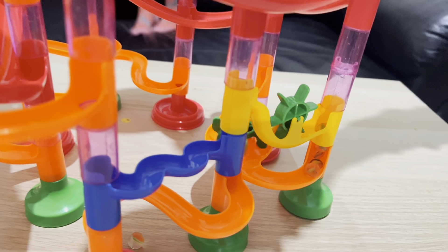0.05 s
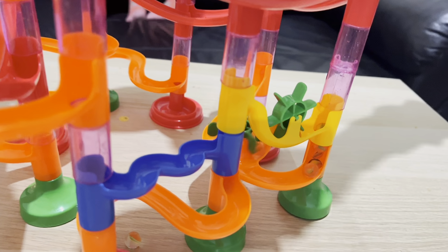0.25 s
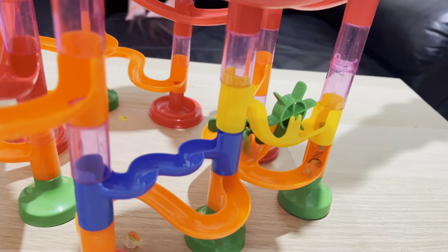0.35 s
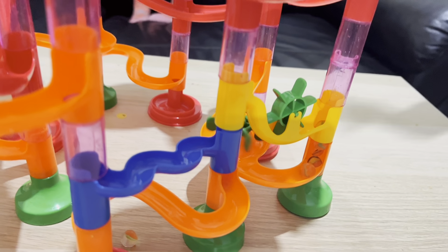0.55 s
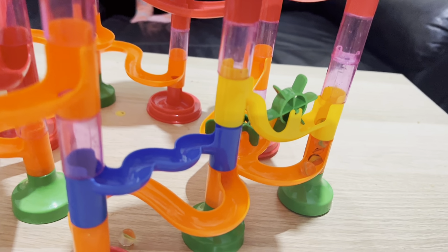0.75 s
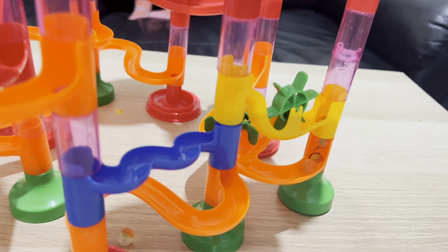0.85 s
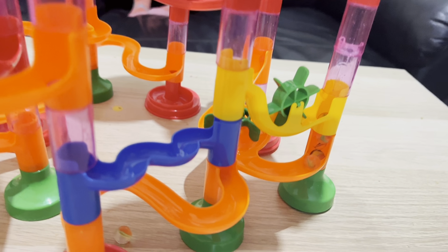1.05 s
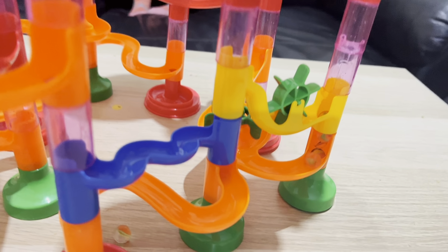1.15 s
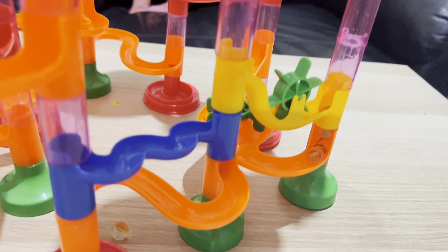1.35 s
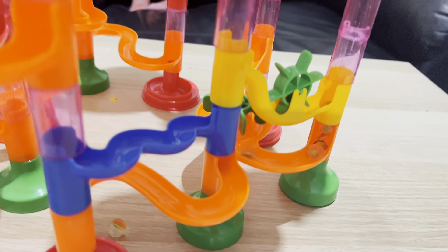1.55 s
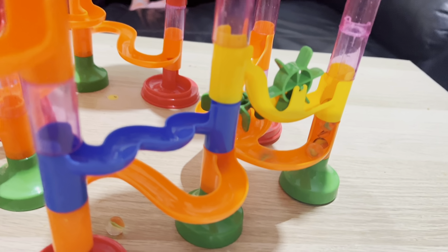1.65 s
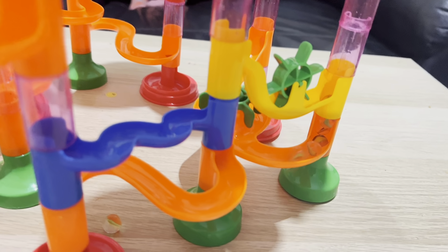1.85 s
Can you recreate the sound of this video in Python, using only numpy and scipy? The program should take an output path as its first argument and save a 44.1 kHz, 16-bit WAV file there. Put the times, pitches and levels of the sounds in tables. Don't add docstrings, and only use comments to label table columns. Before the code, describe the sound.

Glass marbles rattle down a plastic tower track, with bright glassy ticks and hollow tube knocks over a low rolling hum, growing denser to one loud clack, then easing; close phone microphone, small furnished room.

```python
import sys
import numpy as np
from scipy import signal
from scipy.fft import rfft, irfft
from scipy.io import wavfile
from scipy.ndimage import uniform_filter1d

SR = 44100
rng = np.random.default_rng(int(sys.argv[2]) if len(sys.argv) > 2 else 0)


def dump(signal):
    limited = np.clip(np.atleast_2d(signal).T, -1, 1)
    pcm = np.round(limited * 32767).astype(np.int16)
    wavfile.write(sys.argv[1], SR, pcm)


def voltage_ratio(decibels):
    exponent = np.asarray(decibels, float) / 20
    return 10 ** exponent


N = 83790


def unit(x):
    return x / np.sqrt(np.mean(x ** 2))


def peak(x):
    return x / abs(x).max()


def on_log(table, hz):
    table = np.array(table, float)
    return np.interp(np.log(hz + 1), np.log(table[:, 0]), table[:, 1])


def shape(x, gain):
    size = 8192
    cepstrum = irfft(np.log(gain(np.fft.rfftfreq(size, 1 / SR)) + 1e-7))
    cepstrum[1:size // 2] *= 2
    cepstrum[size // 2 + 1:] = 0
    kernel = irfft(np.exp(rfft(cepstrum)))[:size // 2]
    kernel = kernel.reshape((1,) * (x.ndim - 1) + (-1,))
    return signal.fftconvolve(x, kernel, axes=-1)[..., :x.shape[-1]]


def humps(peaks, hz, order=1):
    return np.sqrt(sum(voltage_ratio(2 * db) / (1 + (2 * (hz - f) / w) ** 2) ** order for f, w, db in peaks))


def glass_edge(hz):
    return 1 / (1 + (hz / 5200) ** 24)


def colour(table):
    return lambda hz: voltage_ratio(on_log(table, hz)) * glass_edge(hz)


def burst(length, attack_s, ring_s):
    t = np.arange(length) / SR
    return (1 - np.exp(-t / attack_s)) * voltage_ratio(-60 * t / ring_s)


def sine(hz, length):
    return np.sin(2 * np.pi * hz * np.arange(length) / SR)


def walk(rate):
    k = int(SR / rate)
    steps = np.repeat(rng.standard_normal(N // k + 1), k)
    return 1.3 * uniform_filter1d(uniform_filter1d(steps, k), k)[:N]


def add(out, x, at_s):
    i = int(at_s * SR)
    out[i:i + len(x)] += x[:N - i]


# (f/Hz, width/Hz, level/dB)
TREBLE = [(5620, 850, -2.5), (6150, 1120, -6), (7510, 750, -5), (8010, 1010, -1), (9344, 620, -7),
          (12600, 460, -12), (12500, 480, -13), (13810, 600, -7.5), (14400, 650, -11.5), (15600, 480, -20),
          (16300, 400, -37)]


def ports(hz):
    return humps(TREBLE, hz, order=3)


# (f/Hz, width/Hz, level/dB)
TRACK = [(473, 49, -12), (1175, 25.5, 0), (1310, 30, -7.5), (1655, 56, -1.5), (1994, 130, -8),
         (2550, 92, -7.5), (3360, 9.1, -18.5)]


def track(hz):
    return humps(TRACK, hz)


# (t/s, level/dB)
ROLL = [(0, -45.5), (.06, -51), (.2, -50.5), (.3, -55), (.37, -49.5), (.45, -48), (.53, -48), (.62, -43),
        (.73, -44.5), (.79, -40), (.87, -43.5), (.96, -42), (1.2, -48), (1.33, -48.5), (1.55, -45),
        (1.7, -51), (1.9, -47.5)]
# (f/Hz, level/dB)
ROLL_COLOUR = [(150, -6), (400, 1), (1000, -4.5), (2000, -13), (3300, -18), (4500, -11.5), (5200, -24.5)]


def rolling():
    grit_db, treble_db = -12, -30.5
    body = 0
    for hz in 200 * 2 ** np.arange(0, 5.):
        def band(f):
            bell = np.exp(-(np.log2((f + 1) / hz) / 0.71) ** 2)
            return colour(ROLL_COLOUR)(f) * bell * (1 + voltage_ratio(-1.5) * track(f))
        body = body + shape(rng.standard_normal((2, N)), band) * voltage_ratio(2.4 * walk(25.53))
    high = shape(rng.standard_normal((2, N)), ports) * voltage_ratio(6.4 * walk(34))
    load_db = np.interp(np.arange(N) / SR, *np.array(ROLL).T) - 1.5
    return (unit(body) + voltage_ratio(grit_db) * grit() + voltage_ratio(treble_db) * unit(high)) * voltage_ratio(load_db)


def grit():
    per_s, cycles, middle_hz = 200, 14, 1700
    out, length = np.zeros(N), 1024
    for when, pitch, size in rng.random((400, 3)):
        at_s = when * 400 / per_s
        hz = middle_hz * 2.4 ** (2 * pitch - 1)
        if at_s < N / SR:
            add(out, voltage_ratio(-14 * size) * sine(hz, length) * burst(length, 0.00044, cycles / hz), at_s)
    return unit(out) * np.array([[1], [.5]])


# (t/s, level/dB)
TABLE = [
    (0, -49.5),
    (.8, -44.5),
    (1.15, -47),
    (1.25, -52.5),
    (1.9, -55.5),
]


def table_top():
    hum = shape(rng.standard_normal((2, N)), lambda f: f ** 2 / (f ** 2 + 30 ** 2) / (1 + (f / 220) ** 3))
    level_db = np.interp(np.arange(N) / SR, *np.array(TABLE).T) + 1.65 * walk(20.26)
    return unit(hum) * voltage_ratio(level_db) * voltage_ratio([[0], [-14]])


# (t/s, peak level/dB, treble share level/dB, glass pitch f/Hz, clear ping share level/dB)
TICKS = [(0.0064, -35.5, -13.5, 4330, -3.5), (0.1707, -41, -9.5, 4440, -2), (0.22, -42, -7, 4570, 5),
         (0.234, -30, -7, 3030, -5), (0.239, -20, -7, 4570, -6), (0.2483, -26, -8, 3340, -6),
         (0.2582, -21.5, -7, 3250, -3), (0.273, -26.5, -5, 3300, -10.5), (0.3093, -36, -9, 4600, 2.5),
         (0.3511, -30.5, -4, 3340, -1.5), (0.383, -27, -10.5, 4550, 1), (0.4749, -34.5, -9.5, 4100, -14.5),
         (0.537, -30, -5.5, 4540, -13), (0.5533, -25.5, -7, 4380, -5), (0.557, -26.5, -18, 3340, 0),
         (0.577, -27.5, -8.5, 4240, -5), (0.596, -34.5, -9.5, 3390, -9), (0.6561, -18, -6.5, 4624, -4.5),
         (0.6895, -30, -16.5, 2840, -5.5), (0.7505, -25, -10, 4660, -6), (0.7995, -37, -1, 3330, -9.5),
         (0.8817, -27.5, -7, 3910, -9.5), (0.9047, -27, -11.5, 4400, -8.5), (0.926, -33, -20, 4400, -9),
         (0.9898, -27.5, -5, 4270, -4.5), (0.9943, -9.5, -20, 4334, 3.5), (1.003, -21, -14, 2595, -1.5),
         (1.0216, -26, -9, 4550, -3), (1.0701, -37, -4.5, 4000, -5), (1.0965, -35, -5, 4550, -6),
         (1.1507, -29.5, -12.5, 4330, 0), (1.2897, -38.5, -12.5, 4300, -13), (1.442, -39, -16, 4500, -2),
         (1.4636, -33, -15, 4060, -1), (1.5471, -40.5, -11.5, 4475, -6), (1.841, -32.5, -12.5, 4553, -5.5)]
# (t/s, peak level/dB, treble share level/dB, glass pitch f/Hz, ping share
# level/dB)
MORE_TICKS = [
    (1.716, -45, -27, 5800, 4),
    (0.961, -38, -42, 3100, -3),
    (1.7145, -38, -23, 2100, -3.5),
    (1.166, -30, -4.5, 4300, -1),
    (0.78, -20.5, -39, 2680, 2),
    (0.36, -37, -14, 5600, -13),
    (1.1, -43, -20, 4400, -10),
    (1.582, -40, -13, 4300, -6),
]


def ticks():
    attack_s, chatter_ring_s, glass_width_hz = 0.00048, 0.036, 500
    ping_rise_s, ping_ring_s = 0.0015, 0.029
    treble_ring_s, treble_vary_db = 0.019, 4
    sizzle_db, sizzle_ring_s = -19.5, 0.24
    out, size = np.zeros(N), 8192
    treble_fall = burst(size, attack_s, treble_ring_s) + voltage_ratio(sizzle_db) * burst(size, 0.0029, sizzle_ring_s)
    draws = rng.standard_normal((60, 3, size))
    for (s, db, treble_db, hz, ping_db), noise in zip(TICKS + MORE_TICKS, draws):
        glass = [(hz, glass_width_hz, 0), (3600, 1500, -5)]
        chatter = shape(noise[0] * burst(size, attack_s, chatter_ring_s),
                        lambda f: humps(glass, f) * glass_edge(f))
        ping = sine(hz, size) * burst(size, ping_rise_s, ping_ring_s)
        low = peak(chatter) + voltage_ratio(ping_db) * peak(ping)
        peaks = [(f, w, top_db + treble_vary_db * z) for (f, w, top_db), z in zip(TREBLE, noise[2])]
        high = shape(noise[1] * treble_fall, lambda f: humps(peaks, f, order=3))
        add(out, voltage_ratio(db) * (peak(low) + voltage_ratio(treble_db) * peak(high)), s)
    return out


# (t/s, peak level/dB, tube pitch f/Hz, rattle share level/dB)
KNOCKS = [(0.007, -32, 1635, 1), (0.2417, -20, 2046, 2), (0.2485, -22.5, 1111, -1), (0.259, -23, 1334, 0.5),
          (0.274, -22.5, 1310, -8.5), (0.345, -32.5, 1375, 1.5), (0.381, -26.5, 1310, -2),
          (0.478, -32, 476, 0), (0.541, -27.5, 1523, 1), (0.557, -28.5, 1680, 8), (0.579, -26, 1045, 0.5),
          (0.657, -25.5, 1290, 4.5), (0.688, -27.5, 2243, 4), (0.754, -30.5, 1870, 3.5),
          (0.883, -24.5, 1318, 7), (0.906, -31, 1905, 3.5), (0.919, -25.5, 535, -3),
          (0.995, -12.5, 1560, -3.5), (1.021, -26, 1572, -0.5), (0.332, -36, 3230, 5),
          (0.312, -39.5, 3300, 1.5), (1.154, -31, 1146, -0.5), (1.171, -26.5, 1585, -2),
          (0.565, -30, 2020, 3.5), (0.668, -29.5, 2590, 3), (1.445, -24.5, 1090, -4.5),
          (1.466, -28.5, 1784, 1.5), (1.493, -29.5, 1427, -12), (1.712, -45.5, 980, 6.5),
          (1.765, -40.5, 1590, -6), (1.468, -34, 2063, 1), (0.02, -35, 467, -9), (0.598, -29.5, 1072, -4.5),
          (0.289, -33.5, 1230, -7), (1.007, -24, 1100, -5), (0.991, -33.5, 813, -1.5)]
# (t/s, peak level/dB, tube pitch f/Hz, rattle share level/dB)
DRY_KNOCKS = [(1.071, -21.5, 1800, -0.5), (1.0715, -25.5, 700, -2.5), (1.06, -23, 1560, 0),
              (1.1005, -26.5, 730, -8), (1.12, -28, 1050, -0.5), (1.178, -26.5, 1160, -3.5),
              (1.259, -36.5, 1080, -8), (1.5, -27.5, 1080, -4.5), (1.4085, -28.5, 770, -5.5),
              (0.908, -21.5, 642, -5.5), (0.79, -28, 800, 3), (0.541, -29, 1500, 2),
              (0.99, -25.5, 520, -3.5)]
# (f/Hz, level/dB)
RATTLE_COLOUR = [(150, -9.5), (500, -1.5), (1300, -5), (2700, -9), (3300, -7), (5200, -13.5)]


def knocks():
    tube_width_hz, tube_db = 71, -6.5
    bounces_per_s, scatter_db = 3000, 2.5
    rattle_ring_s, dry_ring_s = 0.12, 0.042
    treble_db, dry_dull_db, track_ring_db = -25, -4, 5.5
    place_spread_s = .00005
    out, size = np.zeros((2, N)), 8192
    noises, lucks = rng.standard_normal((50, size)), rng.random((50, 2, size))
    rings_s = [rattle_ring_s] * len(KNOCKS) + [dry_ring_s] * len(DRY_KNOCKS)
    for (s, db, hz, rattle_db), ring_s, noise, luck in zip(KNOCKS + DRY_KNOCKS, rings_s, noises, lucks):
        tube = burst(size, 0.00043, min(ring_s, 4.13 / tube_width_hz)) * sine(hz, size)
        strength = voltage_ratio(-scatter_db * np.log(luck[1])) * np.sign(noise)
        bounces = (luck[0] < bounces_per_s / SR) * strength * burst(size, 0.0014, ring_s)

        def plastic(f):
            local = humps([(hz, 0.52 * hz, 6), (3200, 700, 3)], f)
            return colour(RATTLE_COLOUR)(f) * (1 + voltage_ratio(track_ring_db) * track(f) + local)
        body, high = shape(bounces, plastic), shape(bounces, ports)
        high_db = treble_db + dry_dull_db * (ring_s < rattle_ring_s)
        rattle = peak(body) + voltage_ratio(high_db) * peak(high)
        knock = voltage_ratio(db) * (voltage_ratio(tube_db) * peak(tube) + voltage_ratio(rattle_db) * rattle)
        add(out[0], knock, s + place_spread_s * noise[0])
        add(out[1], knock, s)
    return out


# (t/s, peak level/dB, table mode f/Hz)
THUMPS = [(0.071, -40.5, 130.4), (0.121, -41, 160), (0.599, -42, 120), (1.85, -40.5, 183), (0.056, -34, 52),
          (0.42, -36, 118), (0.546, -28, 47), (0.669, -33, 48), (0.679, -34.5, 180.2), (.885, -31, 95),
          (0.896, -33, 179.8), (.97, -36, 90)]


def thumps():
    rise_s, ring_s = 0.016, 0.16
    out, length = np.zeros(N), SR // 4
    for s, db, hz in THUMPS:
        add(out, voltage_ratio(db) * sine(hz, length) * burst(length, rise_s, ring_s) * 2, s)
    return out


def room(x):
    t60_s, level_db, dull_hz = 0.4, -11, 2680
    tail = rng.standard_normal((2, SR // 2)) * burst(SR // 2, 0.0011, t60_s)
    tail = shape(tail, lambda f: f / np.hypot(f, 300) / np.hypot(1, f / dull_hz))
    tail = tail / np.sqrt(np.sum(tail ** 2) / 2)
    return signal.fftconvolve(x[None], tail, axes=1)[:, :N] * voltage_ratio(level_db)


# (f/Hz, level/dB)
LEFT_DB = [(40, 1.7), (120, 2.8), (300, 1.8), (700, 6.7), (1300, 2.3), (2400, 7), (4400, 0.34)]
# (f/Hz, phase/rad)
LEFT_LEAD = [(200, .01), (2000, 1.06), (3300, 1.53), (4400, 1.5), (8000, 1.68)]


def scene():
    spread_db = -7.5
    glass = ticks()
    hits = glass + knocks() + thumps()
    steady = rolling() * voltage_ratio([[0], [spread_db]]) + table_top()
    shared = hits + steady[0] + room(hits[1] - .5 * glass)
    shared = shared + steady[1] * np.array([[1], [-1]])
    hz = np.fft.rfftfreq(2 * N, 1 / SR)
    half = voltage_ratio(on_log(LEFT_DB, hz) / 2) * np.exp(.5j * on_log(LEFT_LEAD, hz))
    return irfft(rfft(shared, 2 * N) * np.array([half, 1 / half]))[:, :N]


def gate(x):
    from_hz, base_db, jitter_db = 4100, -104.5, 0.5
    follows = 0.18
    low_extra_db, low_top_hz = 8, 7300
    width = 8
    hz, _, z = signal.stft(x, SR, nperseg=1024)
    band_hz = hz[:512:width, None]
    bands = z[:, :512].reshape(2, -1, width, z.shape[2])
    level_db = 10 * np.log10(np.mean(abs(bands) ** 2, axis=(0, 2)) + 1e-20)
    loud_db = level_db[:width].mean(axis=0)
    limit_db = base_db + follows * (loud_db - loud_db.mean()) + low_extra_db * (band_hz < low_top_hz)
    limit_db = limit_db + jitter_db * 2 * uniform_filter1d(rng.standard_normal(level_db.shape), size=3)
    shut = (band_hz > from_hz) / (1 + voltage_ratio(np.clip(4 * (level_db - limit_db), -99, 99)))
    z[:, :512] *= np.repeat(1 - shut, width, axis=0)
    return signal.istft(z, SR, nperseg=1024)[1][:, :N]


def roll_off(x):
    return signal.sosfilt(signal.butter(12, 16650, fs=SR, output="sos"), x)


def record(dry):
    mix = gate(dry)
    return roll_off(mix)


dry = scene()
out = record(dry)
dump(out)
```